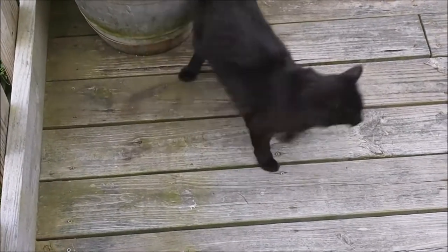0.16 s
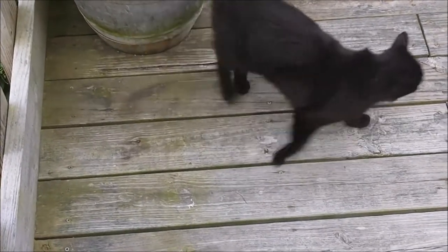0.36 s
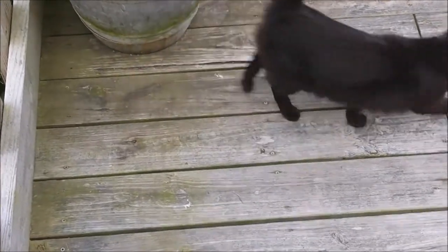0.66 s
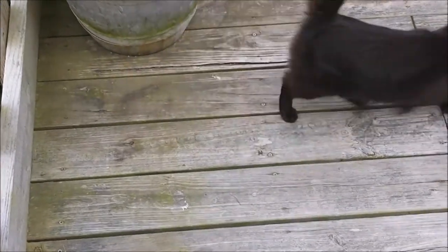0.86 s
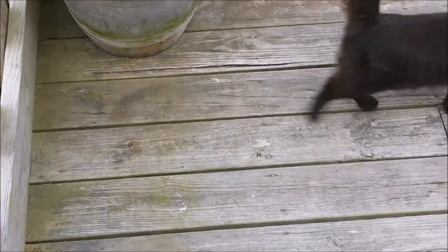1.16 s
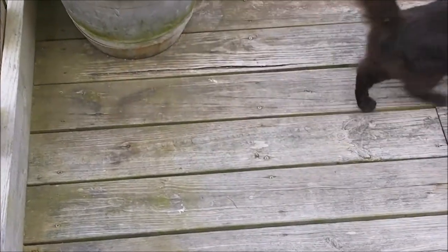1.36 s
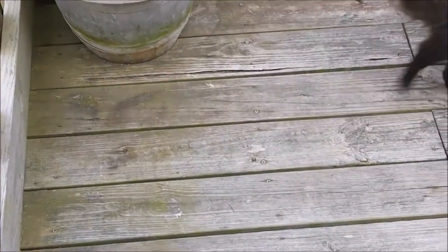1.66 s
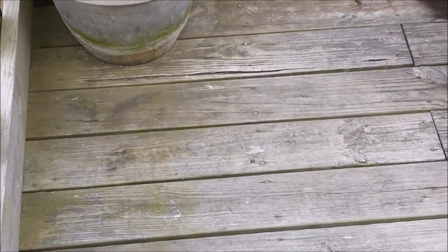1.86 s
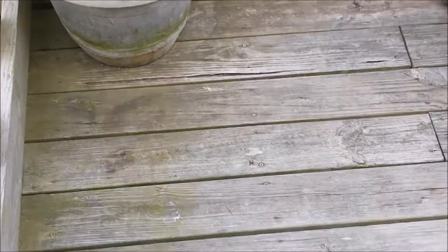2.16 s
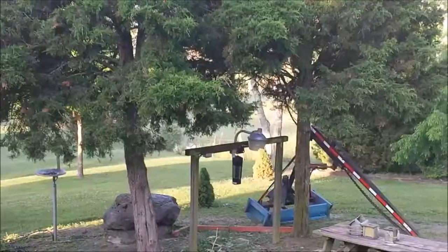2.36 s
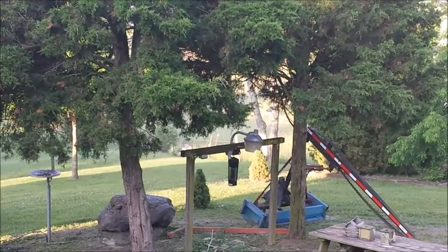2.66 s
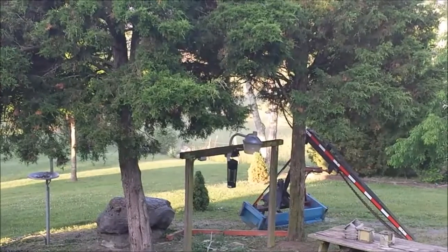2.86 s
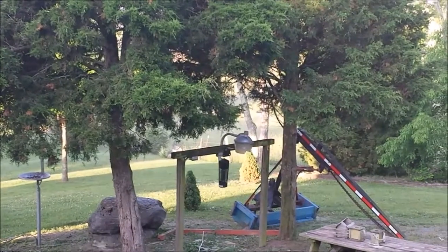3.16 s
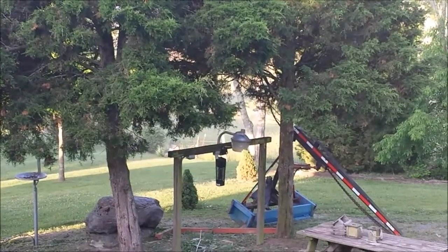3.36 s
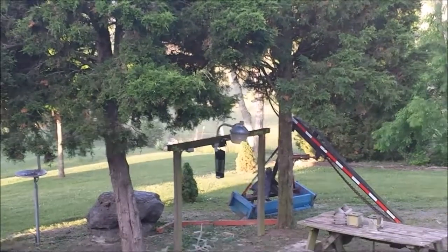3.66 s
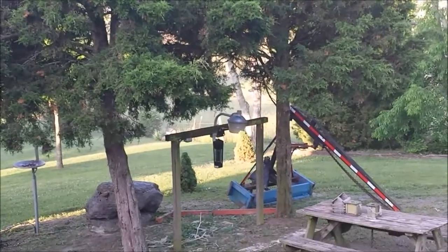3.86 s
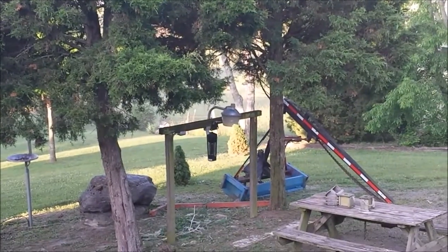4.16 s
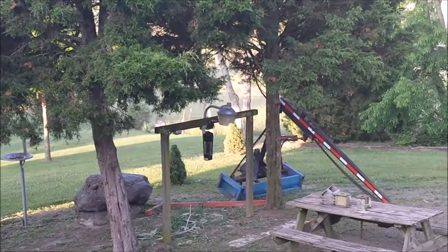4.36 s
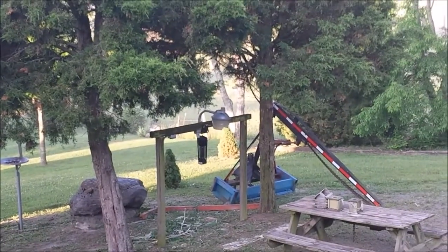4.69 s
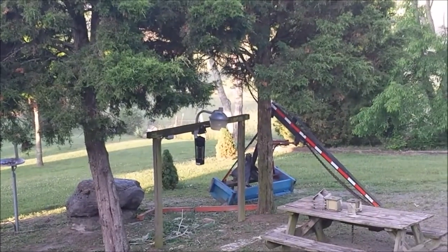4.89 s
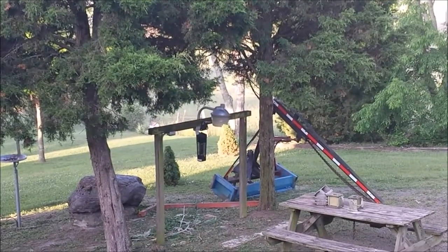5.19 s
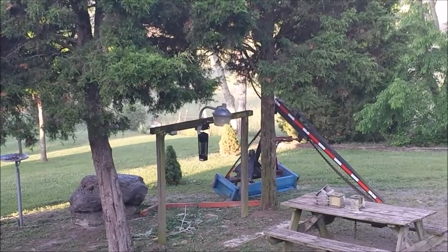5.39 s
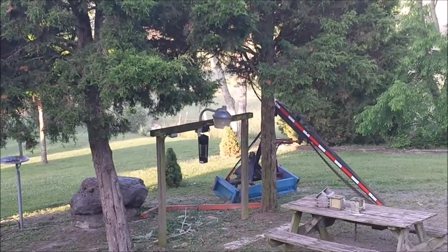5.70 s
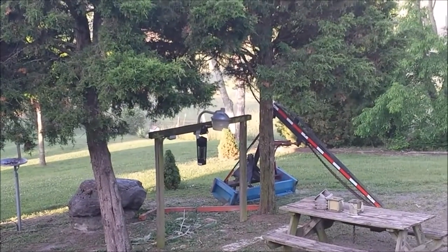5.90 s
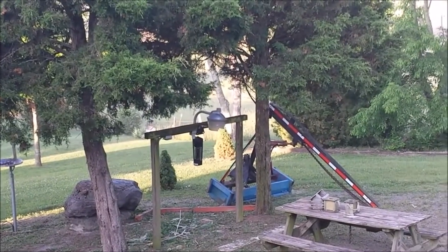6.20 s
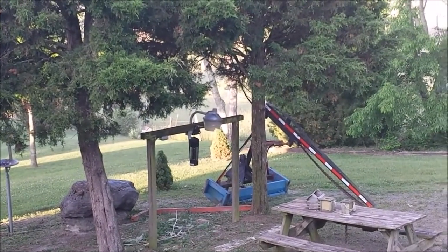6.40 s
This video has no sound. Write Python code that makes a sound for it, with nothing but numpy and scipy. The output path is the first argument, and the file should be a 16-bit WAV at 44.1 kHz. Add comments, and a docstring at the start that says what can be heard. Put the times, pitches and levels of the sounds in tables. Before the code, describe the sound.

Close birdsong in a calm yard: a whistle drops into a rattling trill, another bird answers with rising notes, and distant birds chatter faintly throughout.

```python
"""A long falling whistle opens a songbird's song, and a trill of seven three-stroke syllables ends it.
The song comes twice; between, a second singer warbles, gives five rising notes and chips.
A thin high whistler, far birds, twitter and a remote chorus sing too, in an early morning backyard.
The birds are gliding near-sine tones with tree echo; air, leaves, drone and hiss are coloured noise.
Soft bumps are damped low tones, and tiny ticks are very short noise."""
import sys
import numpy as np
from scipy import signal
from scipy.fft import rfft, irfft
from scipy.io import wavfile
from scipy.ndimage import uniform_filter1d

SR = 44100
rng = np.random.default_rng(int(sys.argv[2]) if len(sys.argv) > 2 else 0)


def inscribe(sig):
    """Save sig as 16-bit PCM at rate SR to the path in sys.argv[1].

    A 1-D sig is mono; a 2-D sig holds one channel per row.
    Samples are clipped to [-1, 1] before scaling.
    """
    pcm = np.round(np.clip(np.atleast_2d(sig).T, -1, 1) * 32767)
    wavfile.write(sys.argv[1], SR, pcm.astype(np.int16))


N = 288414
TIME = np.arange(N) / SR


# In all tables levels are relative, and left-right is positive when the left is louder.
# the two songs: start t/s, level/dB, left-right level/dB, lag of the left side t/s
SONGS = [(-.073, 0.86, 0.9, 0), (4.94, -2, 42, 0.00037)]
# trill syllables: beat t/s after song start, level/dB
TRILL = [(0.55, -3.5), (0.68, -2.5), (0.8066, -0.5), (0.934, 0), (1.07, 0), (1.205, -0.5), (1.363, -2.5)]


def near_singer():
    """Each song is a whistle and a trill, heard directly and as echoes from close and deeper trees."""
    out = np.zeros((2, N))
    for start, song_db, pan_db, lag_s in SONGS:
        song = np.zeros(N)
        add(song, start, whistle())
        for beat, db in TRILL:
            song += syllable(start + beat, db)
        left, right = panned(from_db(song_db) * song, pan_db)
        out += [later(left, lag_s), right]
    close_leaves = from_db(-17) * trees(out, t60=0.12)
    deeper_trees = from_db(-44) * trees(out, t60=0.34)
    return out + close_leaves + deeper_trees


# the whistle falls quickly to a knee, then ever more slowly: t/s after its start, f/Hz
WHISTLE_TURNS = [(0.012, 4624), (0.134, 3200), (0.25, 2728), (0.323, 2553)]
WHISTLE_S, WHISTLE_ATTACK_S, WHISTLE_RELEASE_S = 0.34, 0.025, 0.072
WHISTLE_DB = -30   # at its loudest, before the song's level
WHISTLE_PEAK_S, WHISTLE_SAG_DB = 0.13, 16.5   # loudest moment; loss a whole note's length away


def whistle():
    """A long pure note, loudest at its knee, whose period lengthens steadily between its turns."""
    t = seconds(WHISTLE_S)
    turn_s, turn_hz = np.transpose(WHISTLE_TURNS)
    hz = 1 / np.interp(t, turn_s, 1 / turn_hz)
    db = WHISTLE_DB - WHISTLE_SAG_DB * ((t - WHISTLE_PEAK_S) / WHISTLE_S) ** 2
    gain = from_db(db) * swell(t, WHISTLE_ATTACK_S, WHISTLE_RELEASE_S)
    return syrinx(hz, gain, waver=0.0015, overtone_db=-35.5)


# the high start of a stroke, before stretch and pitch change: t/s from the stroke's beat, f/Hz, level/dB
HOOK = [(-.012, 6330, -57), (-.0088, 6220, -42), (-.005, 6020, -37.5), (-.0028, 5700, -39),
        (-.001, 5300, -50)]
# the low sweep of the first two strokes: t/s from the stroke's beat, f/Hz, level/dB
SHORT_SWEEP = [(-.0048, 5250, -42), (-.003, 4970, -27.5), (0, 4300, -25), (.003, 3750, -28.5),
               (.0065, 3500, -35), (.009, 3450, -50)]
# the low sweep of the last stroke: t/s from the stroke's beat, f/Hz, level/dB
LONG_SWEEP = [(-.0042, 5100, -44), (-.0025, 4880, -28), (0, 4300, -24.5), (.004, 3550, -25.5),
              (.0115, 3090, -28.5), (.0235, 2690, -31.5), (.036, 2390, -36), (.044, 2210, -43),
              (.05, 2120, -57)]
# three strokes of a syllable: t/s from its beat, stretch of the hook [times],
# pitch of the hook [times], hook level/dB, sweep level/dB
STROKES = [(-.031, 1.5, 1.01, 0, -2.5), (-.016, 1, .995, 0, .5), (0, .9, .98, -2, .5)]


def syllable(beat, db):
    """Three strokes; in each, the high side of the syrinx (voice box) hands over to the low side."""
    out = np.zeros(N)
    for stroke, sweep in zip(STROKES, (SHORT_SWEEP, SHORT_SWEEP, LONG_SWEEP)):
        offset, stretch, hook_pitch, hook_db, sweep_db = stroke
        # no two strokes have quite the same pace and pitch
        variation = 1 + rng.standard_normal(3) * [0.03, 0.012, 0]
        hook = HOOK * variation * [stretch, hook_pitch, 1]
        at = beat + offset
        out += note(at, hook, level_db=db + hook_db + 0.3, waver=0.007, flicker_db=1.2)
        out += note(at, sweep * variation, level_db=db + sweep_db,
                    waver=0.0067, overtone_db=-26.5, flicker_db=1.0)
    return out


# the warble's glide, before each voice's pitch share: t/s, f/Hz, level/dB
WARBLE = [(3.725, 4102, -52), (3.751, 3840, -41), (3.759, 4520, -38), (3.765, 4591, -38),
          (3.789, 3696, -41), (3.803, 4670, -32.5), (3.811, 4430, -37.5), (3.851, 3010, -33),
          (3.889, 2600, -37.5), (3.903, 2466, -49)]
UPPER_VOICE, LOWER_VOICE = 1.012, 0.92   # pitch of each voice as a share of the glide
# rising notes: start t/s, level/dB
RISES = [(4.02, -2), (4.144, -0.46), (4.272, -0.92), (4.4, -0.65), (4.532, -0.32)]
# they sweep up ever faster
RISE_FROM_HZ, RISE_TO_HZ, RISE_BEND = 5137, 7950, 1.41
RISE_S, RISE_ATTACK_S, RISE_RELEASE_S = 0.092, 0.02, 0.069
RISE_DB = -34   # added to each note's level
# the closing chip: t/s, f/Hz, level/dB
CHIP = [(4.703, 2550, -58), (4.717, 2850, -46), (4.722, 3200, -44), (4.7255, 3900, -60), (4.728, 5000, -50),
        (4.731, 4300, -35), (4.736, 3850, -32), (4.752, 3350, -37), (4.765, 3020, -41), (4.779, 2850, -57)]
# the lower voice's flick at the top of the chip: t/s, f/Hz, level/dB
CHIP_FLICK = [(4.727, 4300, -34), (4.731, 3260, -39.5), (4.738, 2820, -42)]


def second_singer():
    """A warble whose two voices beat against each other, then five rising notes and a chip."""
    song = note(0, np.array(WARBLE) * [1, UPPER_VOICE, 1], level_db=-1.2)
    song += note(0, np.array(WARBLE) * [1, LOWER_VOICE, 1], level_db=-7)
    t = seconds(RISE_S)
    hz = RISE_FROM_HZ + (RISE_TO_HZ - RISE_FROM_HZ) * (t / RISE_S) ** RISE_BEND
    for start, db in RISES:
        gain = from_db(RISE_DB + db) * swell(t, RISE_ATTACK_S, RISE_RELEASE_S)
        add(song, start, syrinx(hz, gain, waver=0.007))
    song += note(0, CHIP) + note(0, CHIP_FLICK)
    out = panned(song, pan_db=42)
    return out + from_db(-22.5) * trees(out, t60=0.24)


# level whistles: start t/s, length t/s, f/Hz, level/dB, left-right level/dB
THIN_NOTES = [(2.442, 0.26, 7250, -60.5, -15), (3.2, 0.04, 6680, -45, 9), (3.669, 0.06, 6390, -38.5, 12),
              (3.724, 0.042, 6430, -35.5, 13)]
THIN_ATTACK_S, THIN_RELEASE_S = 0.012, 0.016
# buzzy notes: start t/s, length t/s, f/Hz, flutter f/Hz, level/dB, left-right level/dB
BUZZES = [(0.277, 0.09, 6360, 283, -48, 11), (2.606, 0.065, 6520, 256, -48, 15),
          (3.659, 0.024, 6460, 288, -42, 14), (4.07, 0.082, 6350, 292, -40.5, 22),
          (5.105, 0.061, 6490, 280, -59, 14)]


def high_whistler():
    """Thin level whistles, and high buzzes made by a fast flutter of pitch and loudness."""
    out = np.zeros((2, N))
    for start, length, hz, db, pan_db in THIN_NOTES:
        t = seconds(length)
        gain = from_db(db) * swell(t, THIN_ATTACK_S, THIN_RELEASE_S)
        tone = syrinx(np.full(len(t), hz), gain, waver=0.0038)
        add(out, start, panned(tone, pan_db))
    for start, length, hz, flutter_hz, db, pan_db in BUZZES:
        t = seconds(length)
        wandering_hz = flutter_hz * (1 + 0.15 * drift(64, len(t)))
        flutter = 2 * np.pi * np.cumsum(wandering_hz) / SR
        tone = np.sin(2 * np.pi * hz * t + 0.14 * np.sin(flutter))
        tone *= 1 + 0.61 * np.cos(flutter)
        shape = np.sqrt(np.abs(np.sin(np.pi * t / length)))
        add(out, start, panned(np.sqrt(2) * from_db(db) * tone * shape, pan_db))
    return out + from_db(-8) * trees(out, t60=0.4)


# falling slurs: start t/s, length t/s, first f/Hz, fall [octaves], level/dB, left-right level/dB
SLURS = [(0.302, 0.047, 3770, 0.15, -46.5, 1), (1.204, 0.087, 3600, 0.4, -48.5, -1),
         (1.476, 0.062, 5300, 0.79, -43.5, 8), (2.193, 0.094, 3330, 0.44, -48, 9),
         (2.251, 0.12, 3680, 0.31, -46.5, 4), (2.264, 0.16, 2255, 0.4, -45, 2),
         (2.585, 0.075, 3337, 0.24, -39.5, 6), (2.66, 0.071, 3100, 0.27, -46.5, -14),
         (2.689, 0.08, 2434, 0.43, -46.5, 2), (2.77, 0.045, 2180, 0.198, -51, 0),
         (2.81, 0.045, 6600, 0.25, -48, 17), (2.855, 0.042, 5530, 0.53, -44.5, 8),
         (3.745, 0.045, 9500, 0.53, -52, -4), (3.929, 0.042, 3290, 0.33, -51.5, 2),
         (4.379, 0.061, 4650, 0.81, -53.5, -4), (4.638, 0.05, 2596, 0.36, -45, 27),
         (6.422, 0.077, 4800, 0.64, -51.5, 12)]
SLUR_BEND = 0.89   # under 1: the fall is steepest at the start
# a recurring upturned call: start t/s, level/dB, left-right level/dB
UPTURNS = [(1.545, -46.5, 7), (2.27, -45, 2), (2.895, -42, -1), (3.17, -45, 3), (3.853, -42.5, -5),
           (4.237, -47, -21), (5.4, -55, 8), (6.485, -52.5, 18)]
UPTURN_S, UPTURN_FROM_HZ, UPTURN_TO_HZ, UPTURN_BEND = 0.063, 3440, 3960, 1.89
# arched peeps: start t/s, top f/Hz, level/dB, left-right level/dB
PEEPS = [(2.462, 7950, -51, -15), (2.595, 8780, -53, -16), (2.716, 8300, -52, -15), (2.946, 4350, -51, 2),
         (3.02, 3010, -50.5, -2), (3.684, 4230, -51, -7), (3.987, 7480, -50, 20), (4.485, 4750, -52, -2),
         (4.492, 3400, -45, -6)]
PEEP_S, PEEP_DROOP = 0.054, 0.11   # droop: share of the pitch lost at both ends
# a distant wailing call: t/s, f/Hz, level/dB
WAIL = [(2.22, 877.1, -47), (2.236, 873.6, -63), (2.282, 956.6, -43.5), (2.358, 986.2, -58),
        (2.42, 879.1, -50.5), (2.442, 972.1, -43), (2.53, 943.7, -54.5), (2.565, 835.1, -48)]


def far_birds():
    """Falling slurs, upturned calls, arched peeps and a low wail, blurred by the trees."""
    out = np.zeros((2, N))
    for start, length, hz, fall, db, pan_db in SLURS:
        line = hz * 2 ** (-fall * progress(length) ** SLUR_BEND)
        add(out, start, far_call(line, db, pan_db))
    upturn = UPTURN_FROM_HZ + (UPTURN_TO_HZ - UPTURN_FROM_HZ) * progress(UPTURN_S) ** UPTURN_BEND
    for start, db, pan_db in UPTURNS:
        add(out, start, far_call(upturn, db, pan_db))
    arch = 1 - PEEP_DROOP * (2 * progress(PEEP_S) - 1) ** 2
    for start, hz, db, pan_db in PEEPS:
        add(out, start, far_call(hz * arch, db, pan_db))
    wail = panned(note(0, WAIL, level_db=-1.5, waver=0.0037), pan_db=2)
    # much arrives scattered: quickly by foliage and slowly by the wood's edge
    foliage = from_db(-4.0) * trees(out + wail / 2, t60=0.14)
    wood_edge = from_db(-7.0) * trees(out, t60=0.44)
    return from_db(-5.0) * out + foliage + wood_edge + wail


# bouts of faint chirps: start t/s, end t/s, level/dB
TWITTER_BOUTS = [(0.7, 1.6, -61), (2.15, 3.153, -55.5), (3.798, 4.65, -54.5), (5.4, 6.498, -61)]
TWITTER_LOW_HZ, TWITTER_HIGH_HZ, TWITTER_S = 2730, 6060, 0.054   # range of middle pitches; chirp length
TWITTER_GLIDE_OCTAVES = 0.244   # largest glide to either side of the middle pitch


def twitter(count=10):
    """Each bout scatters faint chirps, mostly low ones, gliding up or down; they arrive mainly as echo."""
    out, along = np.zeros((2, N)), progress(TWITTER_S)
    for first, last, db in TWITTER_BOUTS:
        for k, (delay, height, glide, side) in enumerate(rng.random((count, 4))):
            hz = TWITTER_LOW_HZ * (TWITTER_HIGH_HZ / TWITTER_LOW_HZ) ** (height ** 2)
            line = hz * 2 ** (TWITTER_GLIDE_OCTAVES * (2 * glide - 1) * (2 * along - 1))
            start = first + (last - first) * (k + delay) / count
            add(out, start, far_call(line, db, pan_db=12 * (2 * side - 1)))
    return from_db(-7) * out + trees(out, t60=0.2)


# the blended song of many remote birds: t/s, level/dB
CHORUS = [(0, -62), (1.3, -57), (1.8, -63), (2.3, -57), (3.5, -60.5), (4.5, -56.5), (5.1, -63),
          (6.5, -60.5)]


def chorus():
    """Remote birds merge into a soft, shimmering band of noise."""
    colour = [(2200, -1.5), (2800, 3), (3400, 2), (4000, 0.5), (5000, -2.0)]   # f/Hz, level/dB
    return from_db(in_time(CHORUS)[0]) * noise(colour, patchy_db=1.0)


# soft bumps: start t/s, level/dB, lower f/Hz
BUMPS = [(2.155, -43, 60), (2.233, -39, 55), (2.906, -27, 144), (2.998, -30, 145)]


def bumps(t60=0.073, upper_ratio=1.78, upper_db=-9):
    """Each soft bump is two low tones that die away together by 60 dB in t60 seconds."""
    out, t = np.zeros(N), np.arange(SR // 4) / SR
    for start, db, hz in BUMPS:
        thud = np.sin(2 * np.pi * hz * t)
        thud += from_db(upper_db) * np.sin(2 * np.pi * upper_ratio * hz * t)
        soft_start = 1 - np.exp(-t / 0.006)
        add(out, start, from_db(db + 4.0 - 60 * t / t60) * thud * soft_start)
    return out


# tiny dry ticks: start t/s, level/dB
TICKS = [(1.378, -47), (1.983, -46), (3.402, -51), (4.456, -34)]


def ticks(decay_s=0.00095):
    """Each tick is white noise that fades within about a millisecond."""
    out, t = np.zeros((2, N)), np.arange(SR // 100) / SR
    for start, db in TICKS:
        crackle = rng.standard_normal((2, len(t))) * np.exp(-t / decay_s)
        add(out, start, from_db(db) * crackle)
    return out


def background():
    """Moving air, leaves, a low drone and hiss, together slightly louder on the left."""
    out = breeze() + leaves() + drone() + hisses()
    return out * from_db(np.array([[0.6], [-0.6]]))


# course of the breeze: t/s, rumble level/dB, air level/dB
BREEZE = [(0.0, -58, -60), (1.16, -57, -60), (2.0, -57, -59), (2.44, -54.5, -53), (3.08, -51.5, -54),
          (3.39, -52.5, -52.5), (3.82, -55, -57), (5.63, -57.5, -59), (6.54, -59, -58.5)]
# colour of the rumble: f/Hz, level/dB
RUMBLE = [(12, -43), (20, -14), (49, -5), (70, -4.5), (86, 2), (131, 0.5), (183, -4), (214, -1.5),
          (308, -7), (450, -23), (580, -21), (990, -120)]
# colour of the air noise: f/Hz, level/dB
AIR = [(210, -64), (350, -0.5), (685, -4.5), (884, -2.5), (1080, -5.5), (1630, -9), (2000, -10), (2600, -8),
       (4400, -120)]


def breeze():
    """Low rumble and soft air noise, each following its own level curve."""
    rumble_db, air_db = in_time(BREEZE)
    rumble = from_db(rumble_db + 2.0) * noise(RUMBLE, patchy_db=1.0)
    air = from_db(air_db + 0.82) * noise(AIR, patchy_db=0.6)
    return rumble + air


# course of the faint rustle: t/s, level/dB
RUSTLE = [(0.0, -69.5), (0.8, -70.5), (1.15, -68.5), (1.75, -69.5), (2.29, -65), (3.84, -70.5),
          (6.54, -71.5)]
# colour of the leaves: f/Hz, level/dB
LEAVES = [(1000, -34), (1700, -24), (2420, 1), (2650, -33), (3070, -15), (4130, -11), (6620, -1.5),
          (14000, -17), (15500, -26)]


def leaves():
    """Leaves rustle as faint, patchy noise."""
    return from_db(in_time(RUSTLE)[0] + 8.0) * noise(LEAVES, patchy_db=1.9)


def drone():
    """A narrow low band of noise with a faint upper hum, swelling together."""
    # colours: f/Hz, level/dB
    low_colour = [(70, -38), (81, -8), (84, 6.5), (87, -19), (100, -20)]
    hum_colour = [(195, -18), (212, 0), (228, -26)]
    low = from_db(-3.5) * noise(low_colour, patchy_db=0.0)
    hum = from_db(-11) * noise(hum_colour, patchy_db=2.5)
    return drone_level() * (low + hum)


# swells of the drone: peak t/s, level/dB, rise t/s, fall t/s
DRONE_SWELLS = [(3.27, -47, 0.11, 0.78), (5.029, -50.5, 0.077, 0.24)]
DRONE_STEADY_DB = -64.5   # before the levels of the two bands


def drone_level():
    """A steady level, plus swells that grow and die exponentially."""
    level = from_db(DRONE_STEADY_DB)
    for peak, db, rise, fall in DRONE_SWELLS:
        distance = np.maximum((peak - TIME) / rise, (TIME - peak) / fall)
        level = level + from_db(db) * np.exp(-distance)
    return level


# bursts of hiss: start t/s, end t/s, first level/dB, last level/dB
HISSES = [(1.758, 1.821, -60, -54), (1.956, 3.196, -54.5, -66), (3.143, 3.6, -45.5, -50.5)]
# their colour: f/Hz, level/dB
HISS = [(1060, -5), (1800, -2.5), (2850, 1), (3530, -4.5), (4480, -6), (4990, 3), (6500, 2), (6990, -2.5),
        (7400, -9), (10000, -22.5), (13000, -82), (22000, -120)]


def hisses():
    """Coloured noise let through in bursts, with a quick fade in and one twice as long out."""
    out, hiss = np.zeros((2, N)), noise(HISS, patchy_db=1.8)
    for start, end, first_db, last_db in HISSES:
        gate = np.clip(np.minimum(TIME - start, (end - TIME) / 2) / 0.011, 0, 1)
        out += hiss * gate * from_db(np.interp(TIME, [start, end], [first_db, last_db]))
    return out


def syrinx(hz, gain, waver=0.0026, overtone_db=-38, flicker_db=0.54):
    """One side of a bird's voice box: a near sine with a faint octave, wavering in pitch and level."""
    pitch = hz * (1 + waver * drift(402.5, len(hz)))
    phase = 2 * np.pi * np.cumsum(pitch) / SR
    octave = from_db(overtone_db) / (1 + (pitch / 3700) ** 8)  # the throat holds back high overtones
    flicker = from_db(flicker_db * drift(176, len(hz)))
    return np.sqrt(2) * gain * flicker * (np.sin(phase) + octave * np.sin(2 * phase))


def note(start, track, level_db=0, **voice):
    """A syrinx tone gliding along a track of (t/s, f/Hz, level/dB), with its times counted from start."""
    s, hz, db = np.transpose(track)
    s = np.sort(s)
    t = s[0] + seconds(s[-1] - s[0])
    pitch = uniform_filter1d(np.interp(t, s, hz), size=70)  # rounds the corners
    gain = from_db(np.interp(t, s, db) + level_db) * swell(t, 0.0005, 0.0006)
    out = np.zeros(N)
    add(out, start + s[0], syrinx(pitch, gain, **voice))
    return out


FAR_EDGE_DB = 7.5   # loss towards the ends of a far call, besides the final fade to silence


def far_call(hz, db, pan_db):
    """A rough little call along a pitch line, loudest in its middle."""
    off_centre = np.linspace(-1, 1, len(hz))
    gain = from_db(db - FAR_EDGE_DB * off_centre ** 2) * (1 - off_centre ** 20)
    return panned(syrinx(hz, gain, waver=0.013, flicker_db=4.5), pan_db)


def trees(x, t60):
    """Trunks and leaves scatter a diffuse echo to each side, dying by 60 dB in t60 seconds."""
    t = np.arange(SR) / SR
    build_up = 1 - np.exp(-t / 0.0024)
    scatter = rng.standard_normal((2, SR)) * from_db(-60 * t / t60) * build_up
    scatter /= np.sqrt(np.sum(scatter ** 2, axis=1, keepdims=True))
    return signal.fftconvolve(x.mean(axis=0)[None], scatter, axes=1)[:, :N]


# how alike left and right are: f/Hz, likeness [-1 to 1]
LIKENESS = [(30, 0.49), (80, 0.97), (250, 0.93), (550, 0.85), (1100, 0.086), (2000, -0.1), (4000, 0.37),
            (12000, 0.34)]


def noise(spectrum, patchy_db):
    """Stereo noise of a given colour whose level wavers; the sides are most alike in the bass."""
    hz = np.arange(N // 2 + 1) * SR / N + 1
    octaves_below = np.maximum(np.log2(spectrum[0][0] / hz), 0)
    octaves_above = np.maximum(np.log2(hz / spectrum[-1][0]), 0)
    colour_db = at_hz(spectrum, hz) - 14 * (octaves_below + octaves_above)
    alike = np.clip(at_hz(LIKENESS, hz), -1, 1)
    mid, side = rfft(rng.standard_normal((2, N))) * from_db(colour_db)
    mid = irfft(mid * np.sqrt(1 + alike), N)
    side = irfft(side * np.sqrt(1 - alike), N)
    stereo = mid + side * [[1], [-1]]
    return stereo / np.std(mid) * from_db(patchy_db * drift(14, N))


def from_db(db):
    """Decibels to gain."""
    return 10 ** (np.asarray(db) / 20)


def in_time(rows):
    """Each column of a curve at every sample."""
    s, *columns = np.transpose(rows)
    return [np.interp(TIME, s, c) for c in columns]


def at_hz(points, hz):
    """Read a spectrum on a log-frequency axis."""
    point_hz, level = np.transpose(points)
    return np.interp(np.log(hz), np.log(point_hz), level)


def drift(rate, count):
    """Chance values, rate of them a second, joined by straight lines."""
    knots = np.arange(count) * rate / SR
    total = int(knots[-1]) + 2
    return np.interp(knots, np.arange(total), rng.standard_normal(total))


def panned(x, pan_db):
    """Share a sound between left and right, keeping their mean."""
    lean = from_db(pan_db)
    return np.array([lean * x, x]) * 2 / (1 + lean)


def later(x, lag_s):
    """Delay a sound, even by part of a sample, by turning the phase of each frequency."""
    hz = np.arange(N // 2 + 1) * SR / N
    return irfft(rfft(x) * np.exp(-2j * np.pi * hz * lag_s), N)


def add(out, start, sound):
    """Mix a sound in at its start time, leaving out what falls outside."""
    at = int(round(start * SR))
    first, last = max(at, 0), min(at + sound.shape[-1], out.shape[-1])
    if last > first:
        out[..., first:last] += sound[..., first - at:last - at]


def seconds(length):
    """Sample times of a note."""
    return np.arange(int(length * SR)) / SR


def progress(length):
    """From 0 to 1 through a note."""
    return seconds(length) / length


def swell(t, attack, release):
    """Rounded attack, hold and release over the times t."""
    rise = np.clip((t - t[0]) / attack, 0, 1)
    fall = np.clip((t[-1] - t) / release, 0, 1)
    return (np.sin(np.pi / 2 * rise) * np.sin(np.pi / 2 * fall)) ** 2


def scene():
    """All the birds over the yard's background, with bumps and ticks."""
    birds = near_singer() + second_singer() + high_whistler() + far_birds() + twitter() + chorus()
    return birds + background() + bumps() + ticks()


CUTOFF_HZ = 15600


def record(dry):
    """A steep low-pass filter removes the very top of the treble."""
    steep = signal.ellip(10, 0.1, 80, CUTOFF_HZ, fs=SR, output="sos")
    return signal.sosfilt(steep, dry)


dry = scene()
out = record(dry)
inscribe(out)
```